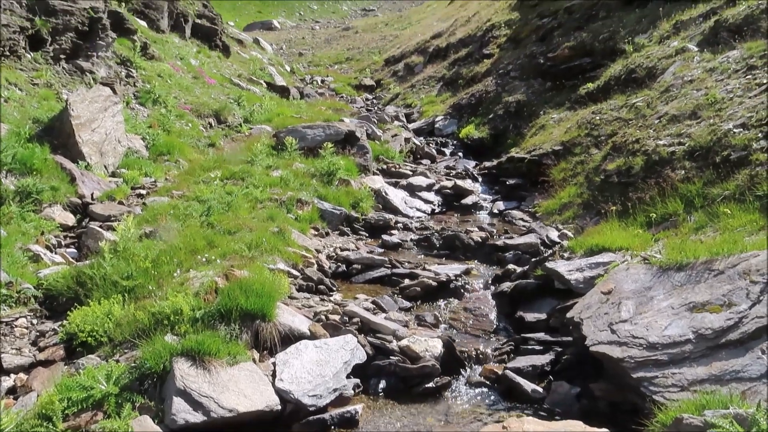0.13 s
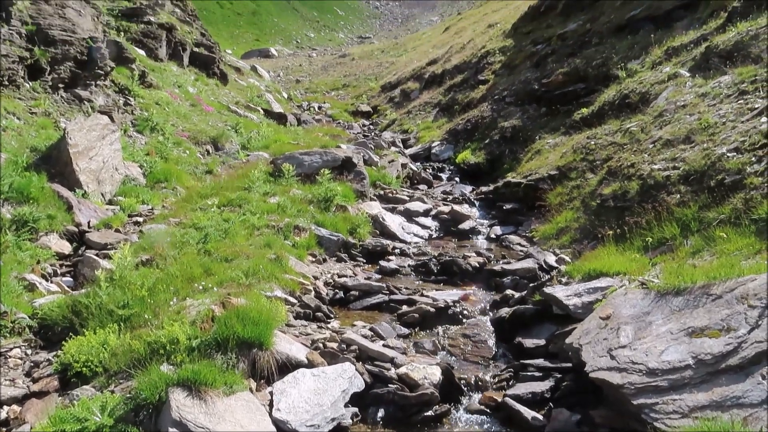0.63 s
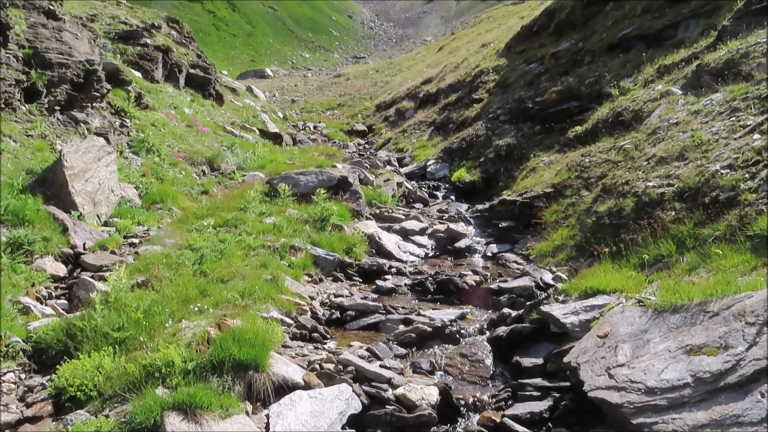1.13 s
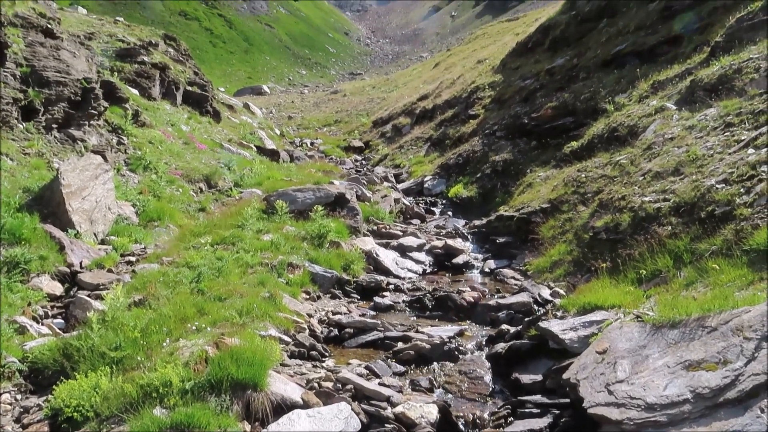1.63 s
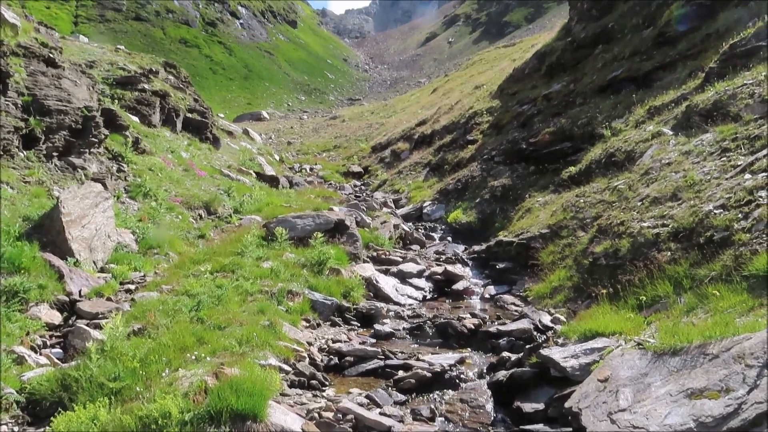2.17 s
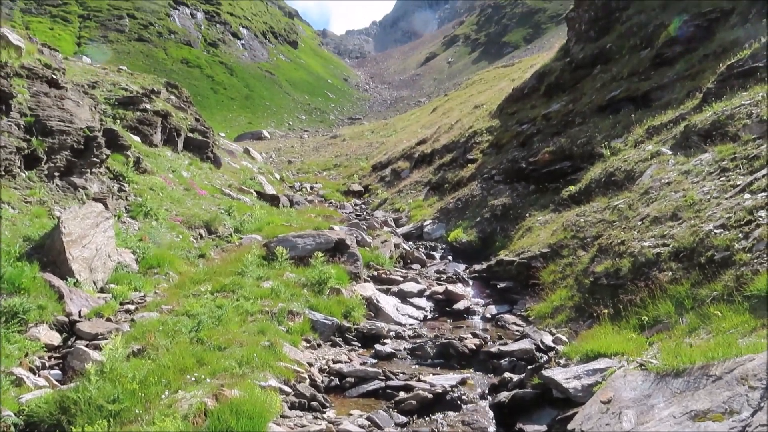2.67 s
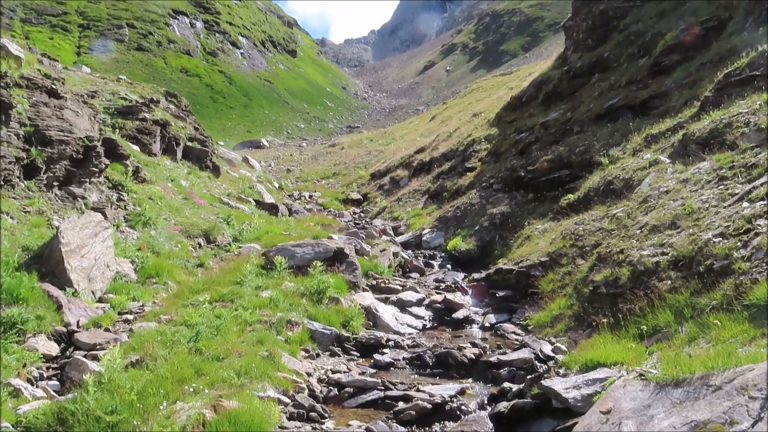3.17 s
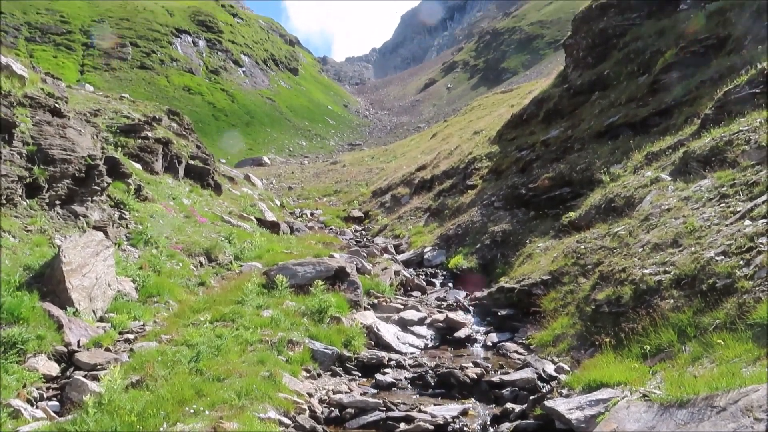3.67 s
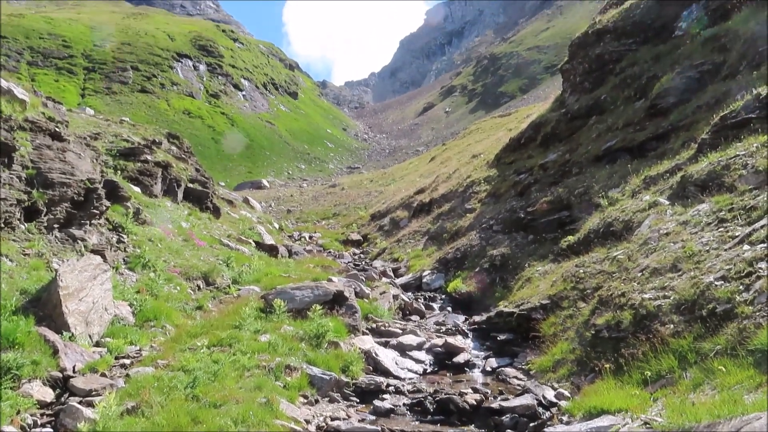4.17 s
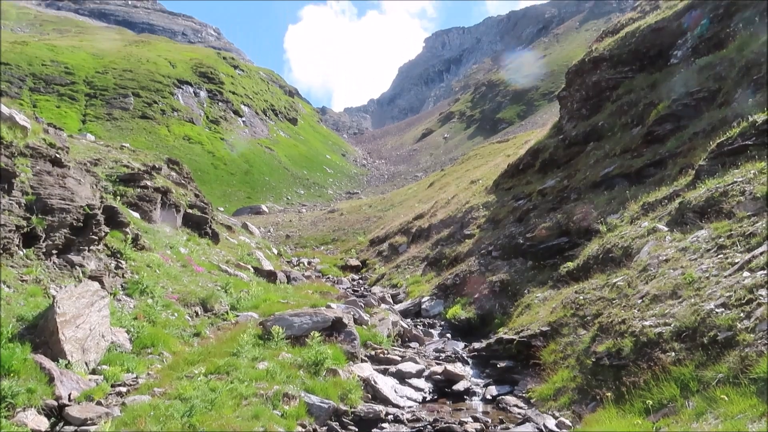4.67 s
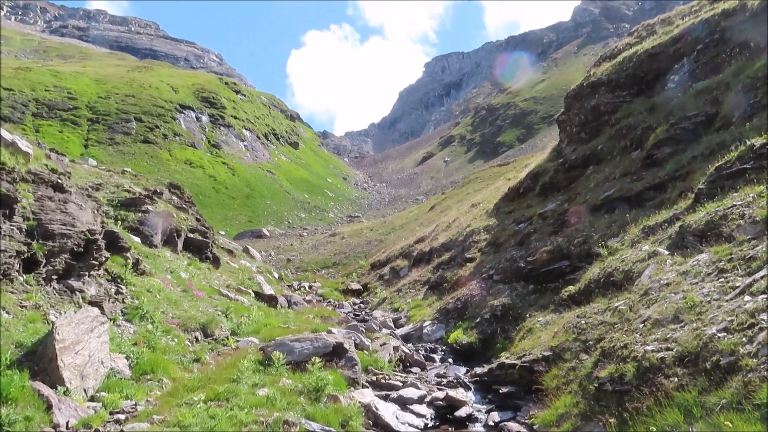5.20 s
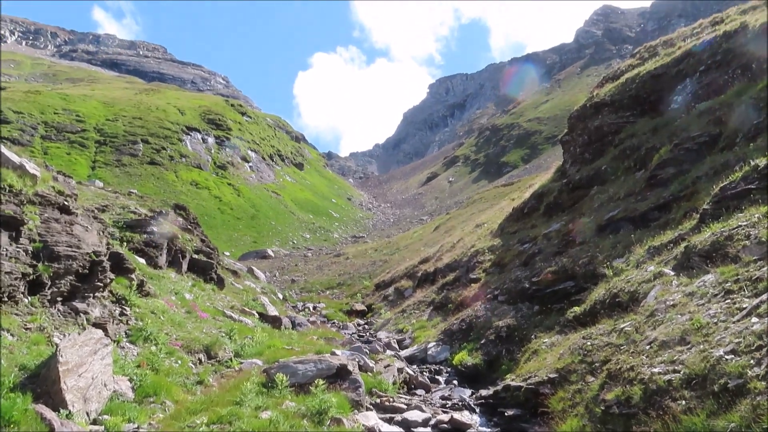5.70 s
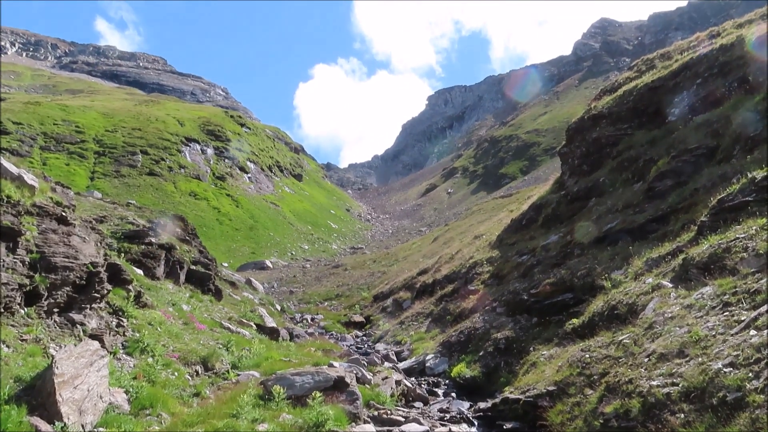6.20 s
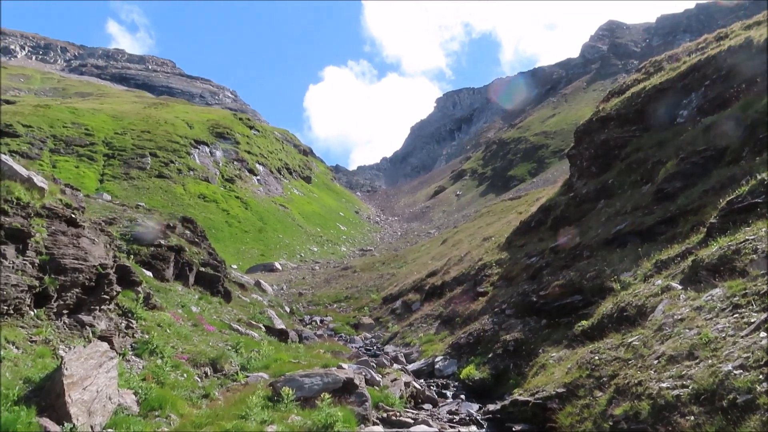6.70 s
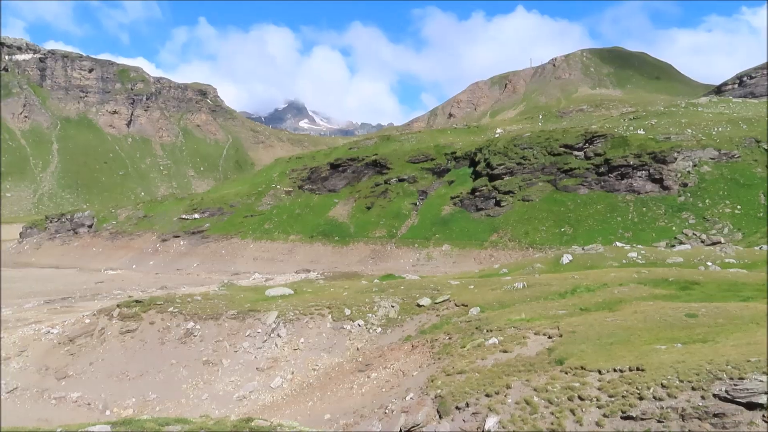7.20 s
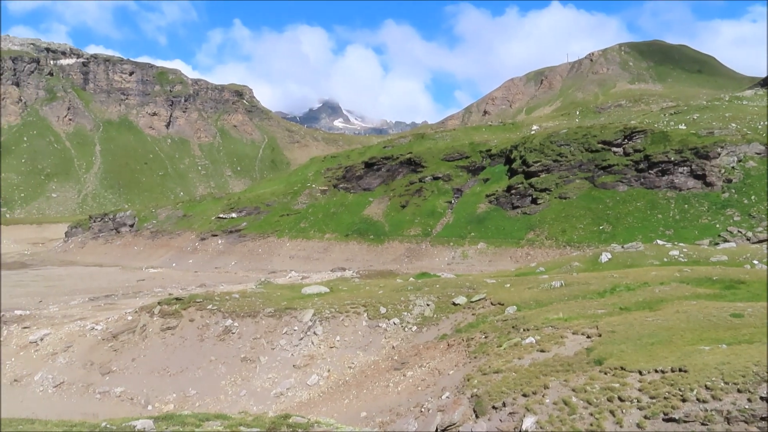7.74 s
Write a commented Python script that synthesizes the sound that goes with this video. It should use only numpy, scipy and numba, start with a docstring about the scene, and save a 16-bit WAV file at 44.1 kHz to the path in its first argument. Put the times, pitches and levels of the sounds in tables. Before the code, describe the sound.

Outdoors in a mountain valley, a shallow brook tumbles over stones with a continuous bubbly rush and small bright drops. Wind rolls over a small stereo camera microphone in dull, uneven thuds that weaken after five seconds. The sound cuts out for a moment near the end, then returns suddenly with louder, higher, raspy wind buffeting and only a thin smooth hiss of far water.

```python
"""A shallow stream tumbles over rocks a few metres from a small camera; gusts roll eddies over its two ports.
The water is hissing noise plus thousands of short gliding tones for bubbles, gurgles, spray and drops.
The wind is many bell-shaped pushes of about a cycle and a half, whose level and pitch follow a list of gusts.
After about 7 s comes a short silent cut. Then the camera stands on an open slope: far water, made
of smooth noise, hisses faintly while stronger wind buffets the ports and adds a rasp of finer eddies."""
import sys
import numpy as np
from scipy import signal
from scipy.fft import rfft, irfft, next_fast_len
from scipy.io import wavfile
from scipy.ndimage import uniform_filter1d
from numba import njit

SR = 44100
rng = np.random.default_rng(int(sys.argv[2]) if len(sys.argv) > 2 else 0)


def rack_gain(trim_db):
    """Turn a fader trim in dB into the linear factor to multiply a signal by."""
    fader = np.asarray(trim_db, float)
    return 10 ** (fader / 20)


def digitize_waveform(pressure):
    """Quantize a signal to 16-bit integers and store it at the path in sys.argv[1].

    Rows of a 2-D input are taken as channels; values are limited to [-1, 1].
    """
    field = np.atleast_2d(pressure).T
    bounded = np.clip(field, -1, 1)
    quanta = np.round(bounded * 32767).astype(np.int16)
    wavfile.write(sys.argv[1], SR, quanta)


N = 346185
T = np.arange(N) / SR
CUT_S, RESUME_S = 6.9605, 7.1082  # the silence lies between these times


def curve(rows):
    """Join the rows of a table with straight lines in time; one signal for each column after the time."""
    s, *columns = np.transpose(rows)
    return [np.interp(T, s, c) for c in columns]


def colour(x, *tables):
    """Filter by the sum of (Hz, dB) spectra, drawn straight between points on a log-frequency scale."""
    size = next_fast_len(N)
    log_hz = np.log(np.maximum(np.arange(size // 2 + 1) * SR / size, 1))
    db = 0
    for table in tables:
        hz, gain_db = np.transpose(table)
        db = db + np.interp(log_hz, np.log(hz), gain_db)
    return irfft(rfft(x, size) * rack_gain(db), size)[..., :N]


def rms(x):
    """Root mean square: the average strength of a signal."""
    return np.sqrt(np.mean(x ** 2))


def walk(rate):
    """Random levels held 1 / rate s and smoothed twice; spread near 1."""
    hold = int(SR / rate)
    steps = np.repeat(rng.standard_normal(N // hold + 1), hold)
    return 0.79 * uniform_filter1d(uniform_filter1d(steps, hold), hold)[:N]


@njit
def wavelets(n, s, hz, rise, fall, glide, turn, a, b):
    """Short gliding tones, bell-shaped either side of their peak, with a gain for each of two outputs."""
    out = np.zeros((2, n))
    for k in range(len(s)):
        mid = int(s[k] * SR)
        first = max(mid - int(3 * rise[k] * SR), 0)
        last = min(mid + int(3 * fall[k] * SR), n)
        for i in range(first, last):
            t = (i - mid) / SR
            u = t / (rise[k] if t < 0 else fall[k])
            v = np.exp(-u * u) * np.cos(2 * np.pi * (hz[k] * t * (1 + glide * u / 4) + turn[k]))
            out[0, i] += a[k] * v
            out[1, i] += b[k] * v
    return out


def hiss(flicker_db, swell_db):
    """White mid and side noise whose half octaves swell together and flicker alone, the treble most."""
    out, swell = 0, walk(12)
    for hz in 60 * 2. ** np.arange(0, 8.5, .5):
        band_shape = [(hz / 1.4, -60), (hz / 1.26, -11), (hz / 1.19, -3), (hz / 1.12, 0),
                      (hz * 1.12, 0), (hz * 1.19, -3), (hz * 1.26, -11), (hz * 1.4, -60)]
        band = colour(rng.standard_normal((2, N)), band_shape)
        level_db = (swell_db * swell + flicker_db * walk(16)) * (hz / 4000) ** 0.28
        out = out + band * rack_gain(level_db)
    return out / rms(out[0])


def mid_side(field, spectrum, side):
    """Colour a white field, turn mid and side into left and right, and scale so that the mid has rms 1."""
    mid = colour(field[0], spectrum)
    edge = colour(field[1], spectrum, side)
    return np.array([mid + edge, mid - edge]) / rms(mid)


# Spectrum of the far water. Each row: frequency in Hz, relative strength in dB per Hz.
FAR_SPECTRUM = [(100, 8.5), (500, -7.5), (1500, -3), (4200, -14), (9700, -34.5), (12500, -36.5),
                (15500, -62)]
# How wide the far water sounds. Each row: frequency in Hz, side minus mid in dB.
FAR_WIDTH = [(300, -43), (900, -40), (1400, -22), (2400, -12.5), (4400, -4), (8000, 4), (15000, 13)]


def far_water():
    """Smooth hiss from across the slope: noise with a slight swell and flicker, its mid at -38 dB rms."""
    return mid_side(hiss(0.69, 0.27), FAR_SPECTRUM, FAR_WIDTH) * rack_gain(-38)


BREEZE_DB, BREEZE_HZ = -48.5, 175  # rumble level and eddy pitch of the air between gusts
GUST_EDGE_DB = 11  # drop one rise or fall time from the peak
# Gusts over the ports, which steer the eddies. Each row: peak time in seconds, rumble level in dB,
# rise in seconds, fall in seconds, eddy pitch in Hz.
GUST_ROWS = [(0.01, -35, .06, 0.2, 109), (.41, -36.5, 0.24, 0.38, 157), (.7, -31.5, 0.17, .1, 70),
             (0.829, -13, 0.034, 0.077, 119.5), (1.01, -30.5, 0.15, 0.083, 103),
             (1.19, -38, 0.08, 0.13, 141), (1.79, -36, 0.073, 0.15, 80.5), (2.01, -35, 0.15, 0.66, 82),
             (2.335, -26.5, 0.076, 0.053, 115), (2.46, -20, 0.057, 0.13, 132),
             (2.585, -11.5, 0.07, 0.03, 180), (2.71, -31.5, 0.067, 0.043, 115),
             (3.33, -24.5, 0.023, 0.13, 160), (3.45, -30, 0.06, 0.064, 110.4),
             (3.58, -34, 0.028, .045, 124), (3.72, -22.5, 0.04, 0.06, 196), (3.95, -42, 0.11, 0.1, 142),
             (4.46, -37.5, .11, .11, 150), (4.57, -24.5, 0.054, .03, 167), (4.68, -25, 0.12, 0.1, 200),
             (4.858, -30, 0.028, .03, 163), (5.095, -28.5, 0.044, 0.047, 133), (5.66, -39, .15, 0.51, 160),
             (6.32, -36, 0.2, .1, 175), (6.51, -38.5, 0.037, .09, 158), (6.79, -41, 0.075, .11, 170),
             (6.945, -42.5, 0.068, .06, 90), (7.135, -13.5, .07, .06, 300), (7.195, -13, 0.033, 0.077, 287),
             (7.25, -10.5, 0.023, 0.047, 290), (7.33, -21.5, 0.043, 0.077, 294),
             (7.379, -13, 0.01, 0.014, 303), (7.41, -21.5, 0.025, 0.028, 297),
             (7.535, -22.5, 0.064, 0.041, 300), (7.592, -17.5, 0.018, 0.044, 308),
             (7.7, -13.5, 0.016, 0.076, 301), (7.79, -21.5, 0.032, 0.052, 300)]


def gusts():
    """Rumble level and eddy pitch: bell-shaped gusts add their power to the breeze and pull the pitch."""
    power = rack_gain(2 * BREEZE_DB) + 0 * T
    pull = power * np.log(BREEZE_HZ)
    for s, db, rise, fall, hz in GUST_ROWS:
        u = (T - s) / np.where(T < s, rise, fall)
        gust_db = np.maximum(db - GUST_EDGE_DB * u * u, -200)
        part = rack_gain(2 * gust_db)  # doubled dB gives power
        power = power + part
        pull = pull + part * np.log(hz)
    return 10 * np.log10(power), np.exp(pull / power)


def eddies(s, hz, half, db, unlike_db, higher):
    """Pushes shared by both membranes, each with a swirl of its own pitch in opposition at the two ports."""
    turn, spin = rng.random((len(s), 2)).T
    push = wavelets(N, s, hz, half, half, 0., turn, rack_gain(db), 0 * s)[0]
    swirl = wavelets(N, s, higher * hz, half, half, 0., spin, rack_gain(db + unlike_db), 0 * s)[0]
    return np.array([push, swirl])


# The strongest single eddies. Each row: peak time in seconds, peak level in dB before the ports' filter,
# pitch in Hz, cycles from rise to fall.
THUMP_ROWS = [(0.608, -23, 96, 3.1), (0.738, -19.5, 64, 1.1), (0.819, -3.5, 124, 0.8),
              (0.851, -10.5, 134, 3.7), (0.869, -20, 126, 1.2), (0.9, -20, 117, 1.5), (0.964, -25, 86, 1.1),
              (0.992, -18, 125, 0.92), (1.18, -24, 170, 1.1), (1.75, -28, 83, 1.3), (1.931, -21.5, 79, 2.7),
              (2.025, -19.5, 87, 0.91), (2.34, -5, 125, 1.53), (2.428, -18, 148, 1.2),
              (2.447, -21.5, 139, 4), (2.484, -6.5, 144, 1.2), (2.559, -10.5, 209, 1.1),
              (2.581, 0.5, 207, 0.88), (2.598, -10.5, 206, 1.2), (2.61, -13.5, 155, 1.6),
              (2.72, -28.5, 123, 1.6), (3.319, -17, 175, 2.3), (3.342, -26.5, 122, 0.81),
              (3.387, -24, 167, 1), (3.42, -26.5, 132, 0.79), (3.473, -23, 105, 1.1),
              (3.572, -29.5, 138, 1.2), (3.689, -17.5, 246, 1.5), (3.733, -15, 210, 2.4),
              (3.754, -7.5, 201, 1.3), (3.779, -17, 200, 1.4), (4.471, -25, 152, 2.1),
              (4.578, -14, 174, 2.3), (4.628, -23.5, 200, 1.1), (4.652, -6.5, 236, 1),
              (4.675, -19, 180, 1.3), (4.713, -12, 233, 1.1), (4.849, -29, 224, 1.3),
              (4.867, -22, 126, 1.2), (5.08, -23, 145, 1.2), (5.107, -16.5, 181, 1.1),
              (7.121, -8, 377, 3.4), (7.143, -11, 235, 0.81), (7.18, -11, 297, 3), (7.259, -3, 240, 2.1),
              (7.279, -18, 335, 3), (7.338, -19, 308, 1.1), (7.38, -15.5, 320, 3), (7.702, -1.5, 372, 1.86),
              (7.74, -15, 320, 2.8), (7.794, -14.5, 335, 2.3)]


def thumps(unlike_db):
    """Strong single eddies, each a push of a few cycles at most; they differ 3 dB more between the ports."""
    s, peak_db, hz, cycles = np.transpose(THUMP_ROWS)
    at = (s * SR).astype(int)
    return eddies(s, hz, .5 * cycles / hz, peak_db, unlike_db[at] + 3, higher=1.37)


def eddy_crowd(t0, t1, count, octaves, higher, db, hz, unlike_db):
    """Random eddies from t0 to t1 seconds that follow the gusts; big ones last longer and push less."""
    when, luck, tone = rng.random((count, 3)).T
    at = ((t0 + when * (t1 - t0)) * SR).astype(int)
    pitch = hz[at] * 2 ** (octaves * (tone - .55))
    size_db = db[at] - 4.14 * np.log(1 - .99 * luck) + 5.5 * tone - 10.0
    return eddies(at / SR, pitch, .75 / pitch, size_db, unlike_db[at], higher)


def rasp(rumble_db):
    """On the open slope, gusts tear into fine eddies above the rumble, far apart at the two ports."""
    db = -34 + 2.4 * (rumble_db + 14)  # each dB of rumble adds 2.4 dB of rasp
    when, luck, tone = rng.random((600, 3)).T
    at = ((RESUME_S + when * (N / SR - RESUME_S)) * SR).astype(int)
    pitch = 520 * 2 ** (1.3 * tone)
    size_db = db[at] - 3.6 * np.log(1 - .99 * luck) - 12 * tone
    return eddies(at / SR, pitch, 1.3 / pitch, size_db, -7 + 0 * tone, 0.91)


UNLIKE_PER_DB = 0.323  # harder gusts differ more between the ports, dB per dB above the breeze
# How the ports and the camera's filter colour the wind. Each row: frequency in Hz, gain in dB.
WIND_FILTER = [(20, 1.5), (60, -1.5), (110, -2.5), (460, -1), (520, -7), (900, -22), (1400, -40)]
# What differs between the ports. Each row: frequency in Hz, extra gain of the side in dB.
WIND_WIDTH = [(40, -11), (150, -6), (450, -2.5), (700, 4), (1400, 5.5)]
# How unlike the wind is at the two ports as the camera turns, before harder gusts add to it.
# Each row: time in seconds, side minus mid in dB.
PORT_ROWS = [(0, -19), (.55, -9.5), (1.0, -7.5), (1.2, -24), (2.3, -20), (2.55, -21), (2.7, -38),
             (3.3, -25), (5, -27), (6.9, -34), (7.11, -34), (7.4, -31), (7.5, -42), (7.85, -49)]


def wind():
    """Eddies push the membranes for a cycle or two: the gusts set how loud and how short they are."""
    db, hz = gusts()
    unlike_db = curve(PORT_ROWS)[0] + UNLIKE_PER_DB * (db - BREEZE_DB)
    field = thumps(unlike_db)
    field = field + eddy_crowd(0, CUT_S, 2000, 1.4, 1.1, db, hz, unlike_db)
    field = field + eddy_crowd(RESUME_S, N / SR, 500, 2.2, 1.7, db, hz, unlike_db)
    fine_mid, fine_edge = rasp(db)
    mid = fine_mid + colour(field[0], WIND_FILTER)
    edge = fine_edge + colour(field[1], WIND_FILTER, WIND_WIDTH)
    return np.array([mid + edge, mid - edge])


def bubbles(count, lo_hz, hi_hz, cycles, spread_db, glide, splash_db):
    """Bubbles of all sizes, even in power per Hz, swelling with each splash; mid and side, spread in width."""
    when, size, luck, turn, side = rng.random((count, 5)).T
    hz = lo_hz * (hi_hz / lo_hz) ** size
    luck_db = -spread_db * np.log(1 - .99 * luck)
    splash = splash_db * walk(30)[(when * N).astype(int)]
    gain = hz * rack_gain(luck_db + splash)
    side_gain = gain * np.sqrt(3) * (2 * side - 1)
    out = wavelets(N, when * N / SR, hz, cycles / hz, cycles / hz, glide, turn, gain, side_gain)
    return out / rms(out[0])


# The clearest single bubbles and drops. Each row: peak time in seconds, peak level in dB before it
# leans to one side, pitch in Hz.
DROP_ROWS = [(0.099, -24.5, 2980), (0.154, -36, 8960), (0.176, -22.5, 3170), (0.314, -26, 3770),
             (0.626, -36, 8040), (0.857, -24, 3430), (0.985, -26, 3300), (1.149, -23, 2860),
             (1.177, -36, 7810), (1.543, -27, 3720), (1.632, -30, 4910), (1.845, -27.5, 750),
             (1.923, -37.5, 13090), (2.066, -25, 3100), (2.093, -28, 1580), (2.514, -29.5, 1300),
             (2.811, -26, 3000), (2.942, -28.5, 574), (3.056, -28, 1250), (3.109, -20.5, 3120),
             (3.141, -28, 4100), (3.391, -29.5, 5280), (3.41, -32, 8960), (3.988, -25.5, 1810),
             (4.078, -40, 13320), (4.169, -29.5, 715), (4.291, -34.5, 6430), (4.312, -26, 800),
             (4.316, -23.5, 1120), (4.437, -27, 890), (4.636, -26, 1270), (4.887, -21, 1130),
             (4.895, -33, 5970), (5.068, -27, 825), (5.526, -24, 3300), (6.149, -32.5, 12600),
             (6.294, -32, 6890), (6.837, -25, 1750)]


def plinks(count):
    """Times, levels and pitches of the clear drops and of the random ones between them."""
    when, size, luck = rng.random((count, 3)).T
    hz = 500 * 2 ** (4.7 * size)
    # -34 dB at 1 kHz, 2.6 dB less per octave up, scattered by 4 dB either way
    db = -34 - 2.6 * np.log2(hz / 1000) + 4 * (2 * luck - 1)
    return np.concatenate([np.transpose(DROP_ROWS), [when * CUT_S, db, hz]], axis=1)


def clear_drops():
    """Single ringing tones: big bubbles ring longer, small drops are nearly clicks and lean to one side."""
    s, db, hz = plinks(count=180)
    turn, side = rng.random((len(s), 2)).T
    ring = 2.97 / hz * (1000 / hz) ** 0.23
    lean = (2 * side - 1) * np.minimum(hz / 14000, .8)
    return wavelets(N, s, hz, 1.5 * ring, ring, 0.13, turn, rack_gain(db) * (1 + lean), rack_gain(db) * (1 - lean))


# Spectrum of the stream. Each row: frequency in Hz, relative strength in dB per Hz.
STREAM_SPECTRUM = [(35, 3.5), (60, -10.5), (135, -7), (242, -4.5), (312, -3.5), (343, -4), (413, -4.5),
                   (953, -3.5), (1290, -5), (1870, -8.5), (2050, -11.5), (4220, -20), (6410, -30),
                   (13500, -40.5), (15500, -44)]
# How wide the stream sounds. Each row: frequency in Hz, side minus mid in dB.
STREAM_WIDTH = [(60, -49.5), (110, -45), (200, -26), (380, -21), (700, -25.5), (1290, -24), (2380, -16),
                (4400, -14), (8120, -5), (15000, 0)]
# The part of the rush whose width drifts. Each row: frequency in Hz, gain in dB.
LOW_PART = [(100, -1), (900, -4), (1600, -23)]
# The part that fades off axis. Each row: frequency in Hz, gain in dB.
TREBLE_PART = [(1200, -47), (2200, 9), (12000, 2)]
# The rush as the camera tilts away from it. Each row: time in seconds, loudness in dB,
# gain of the treble part in dB, gain of the low part's side signal in dB.
FLOW_ROWS = [(0, -33, 1, 10), (1, -34, 1.5, 8), (2, -33.5, 0.7, 3.5), (2.6, -34.5, 1.5, 4),
             (2.8, -34.5, 2, -11), (4, -34, 1.25, -16), (5.1, -35, 1.5, -6.5), (5.6, -34, 1, 1),
             (6.7, -34, 0.5, 3.5), (6.95, -32, 0.5, 3.5)]


def stream():
    """A blur of countless bubbles, a nearer gurgle, long ringing bubbles, one-cycle spray and clear drops."""
    gurgle = bubbles(count=18000, lo_hz=255.0, hi_hz=14340, cycles=3.1, spread_db=3.0, glide=0.3, splash_db=2.0)
    spray = bubbles(count=7000, lo_hz=3130, hi_hz=14740, cycles=0.39, spread_db=-1.0, glide=.05, splash_db=3.5)
    glug = bubbles(count=1800, lo_hz=397.2, hi_hz=12040, cycles=10.6, spread_db=2.5, glide=0.24, splash_db=1.5)
    field = hiss(1.0, 0.48) + rack_gain(-7) * glug + rack_gain(-3.0) * gurgle + rack_gain(-6.5) * spray
    rush = mid_side(field, STREAM_SPECTRUM, STREAM_WIDTH)
    flow_db, treble_db, width_db = curve(FLOW_ROWS)
    side_only = rush - rush.mean(axis=0)
    rush = rush + (rack_gain(width_db) - 1) * colour(side_only, LOW_PART)
    rush = rush + (rack_gain(treble_db) - 1) * colour(rush, TREBLE_PART)
    return rush * rack_gain(flow_db) + clear_drops()


def scene():
    """Stream, then silence, then the open slope; wind in both places."""
    air = wind()
    resume = np.clip((T - RESUME_S) / 0.00012, 0, 1)  # opens in 0.12 ms
    return (T < CUT_S) * (stream() + air) + resume * (far_water() + air)


def roll_off(x):
    """The treble ends steeply here."""
    return signal.sosfilt(signal.butter(12, 15660, fs=SR, output="sos"), x)


def record(dry):
    """The camera softly rounds off the hardest blows, which cannot pass 0.85 of full scale."""
    rounded = 0.85 * np.tanh(dry / 0.85)
    return roll_off(rounded)


dry = scene()
out = record(dry)
digitize_waveform(out)
```